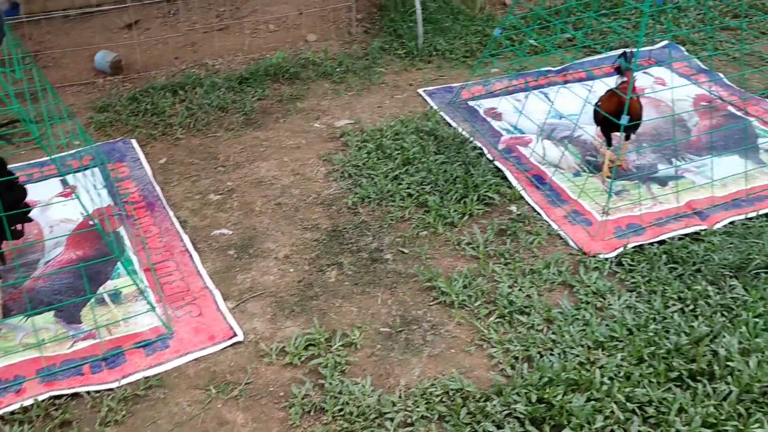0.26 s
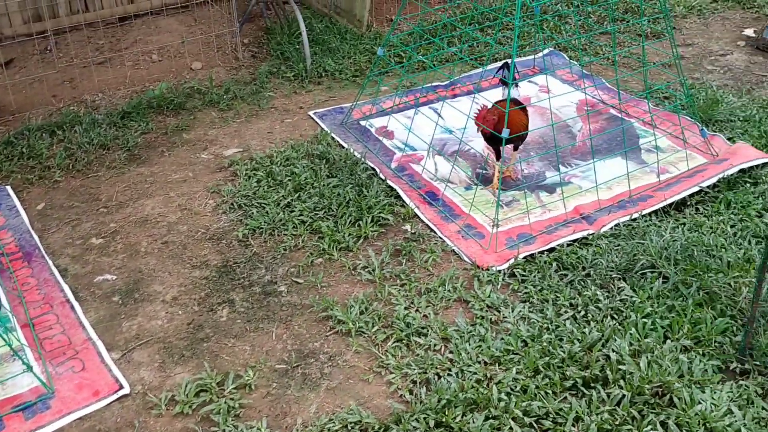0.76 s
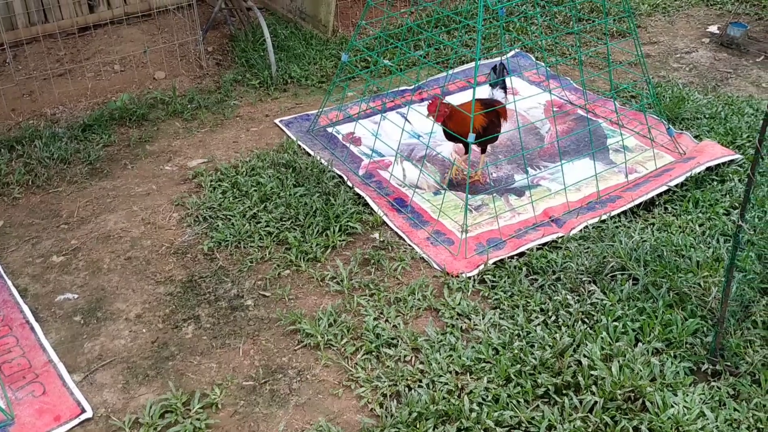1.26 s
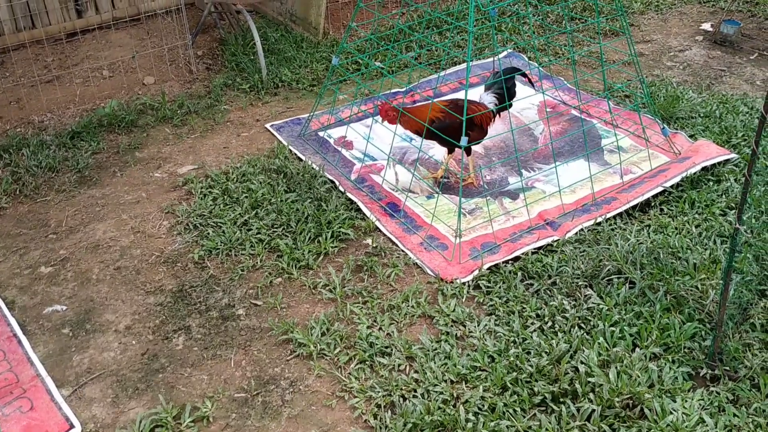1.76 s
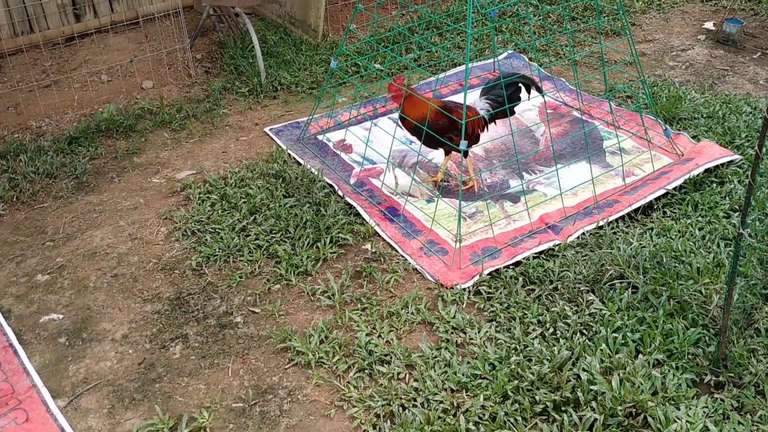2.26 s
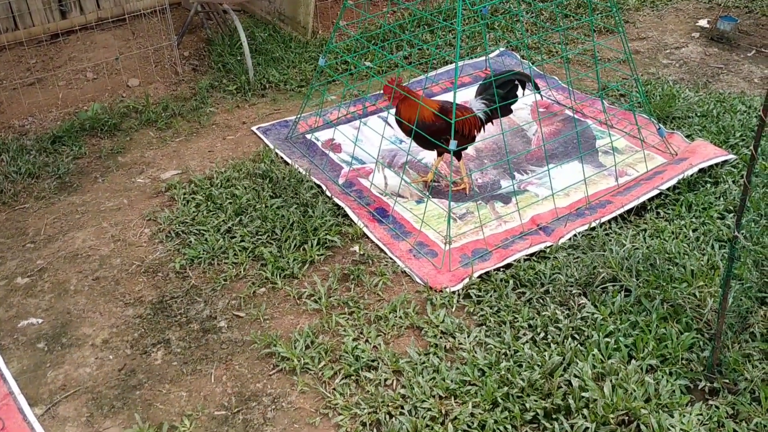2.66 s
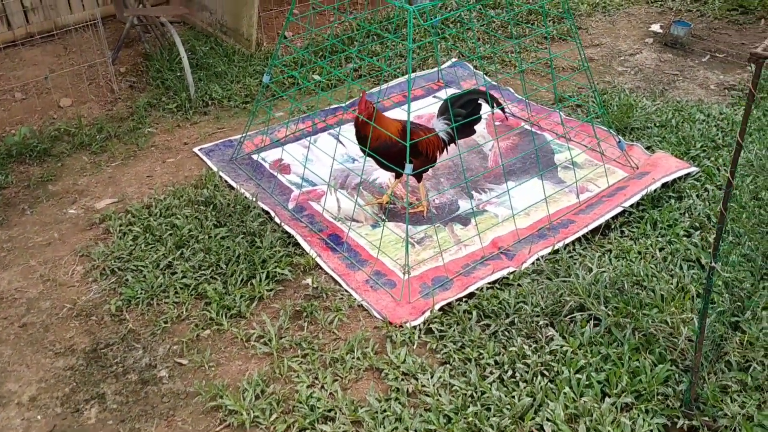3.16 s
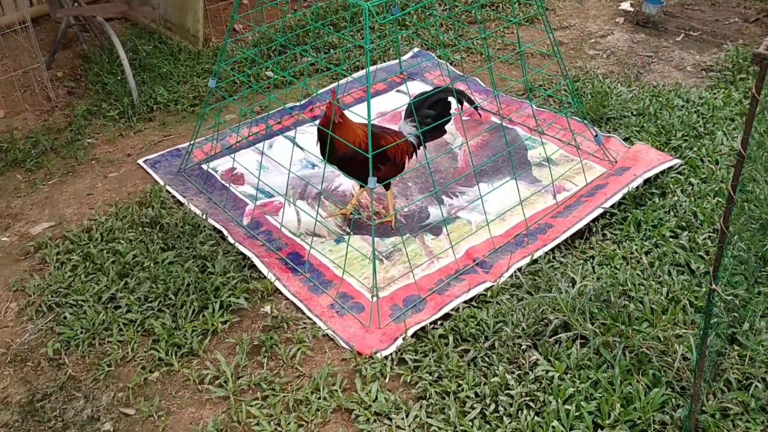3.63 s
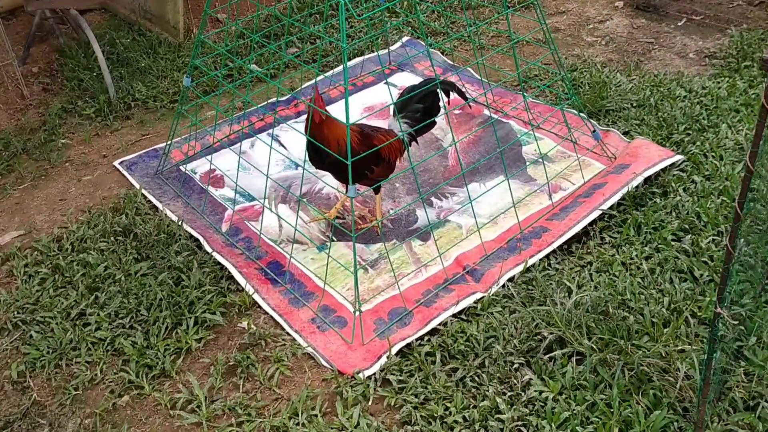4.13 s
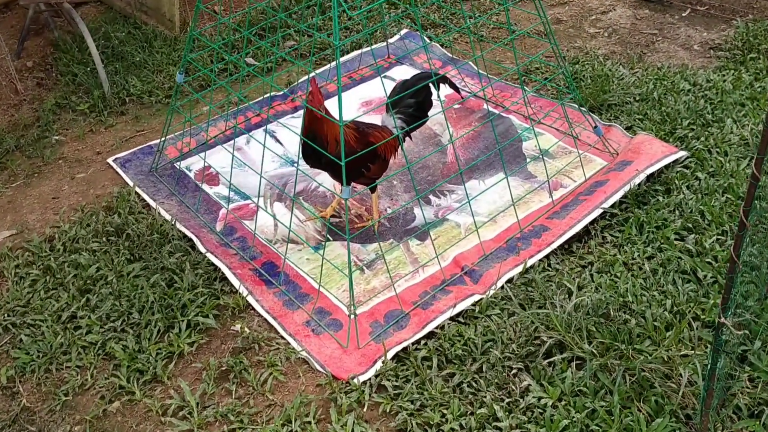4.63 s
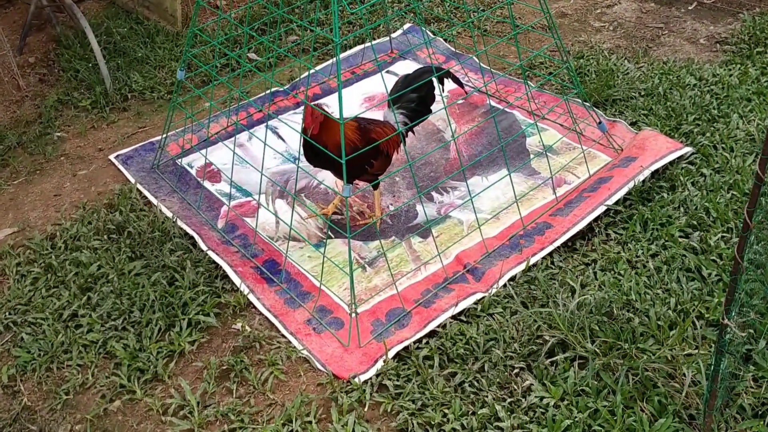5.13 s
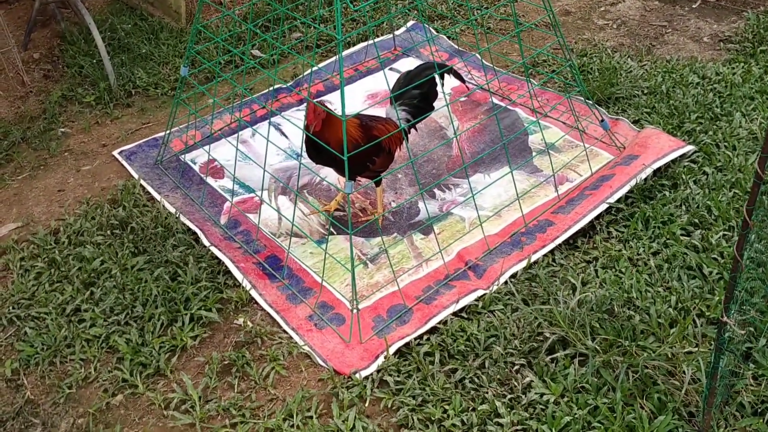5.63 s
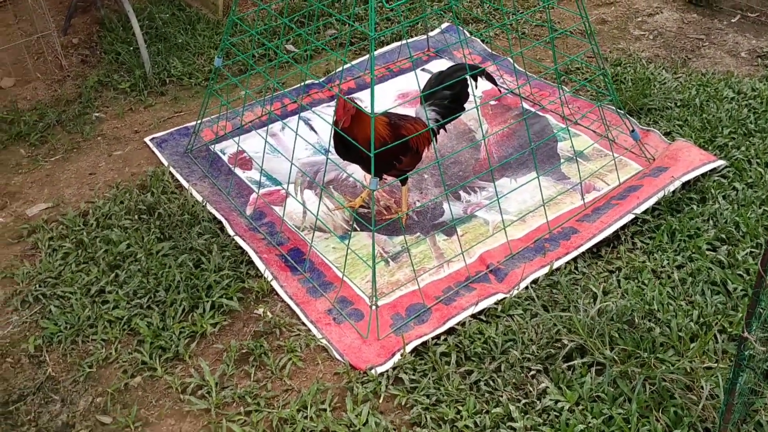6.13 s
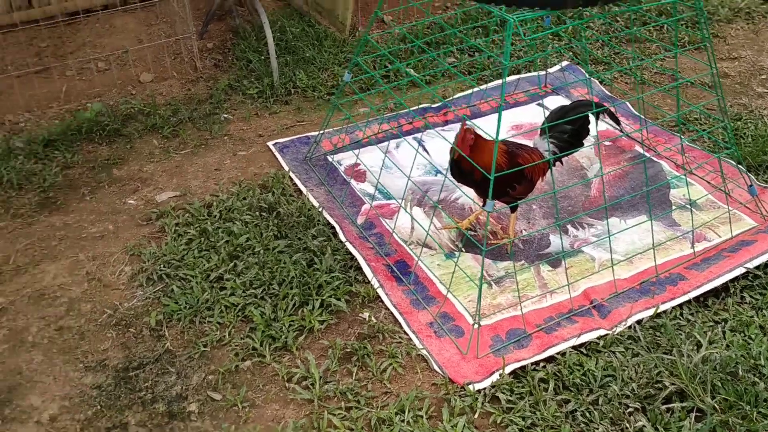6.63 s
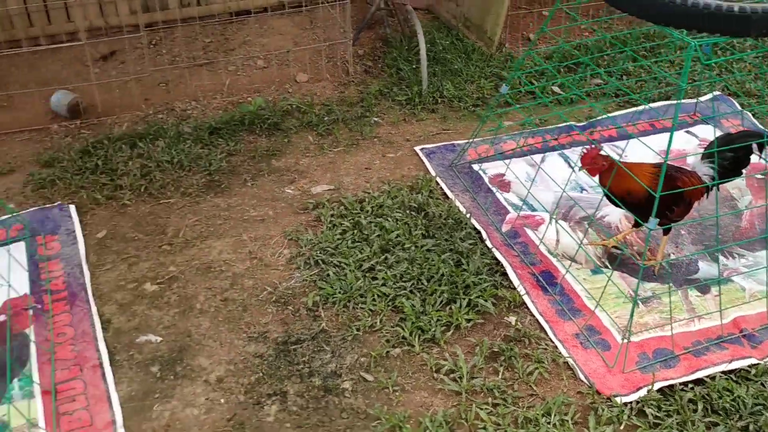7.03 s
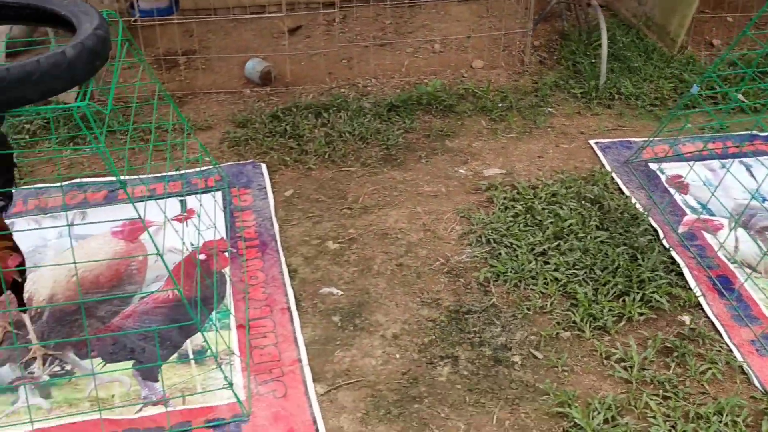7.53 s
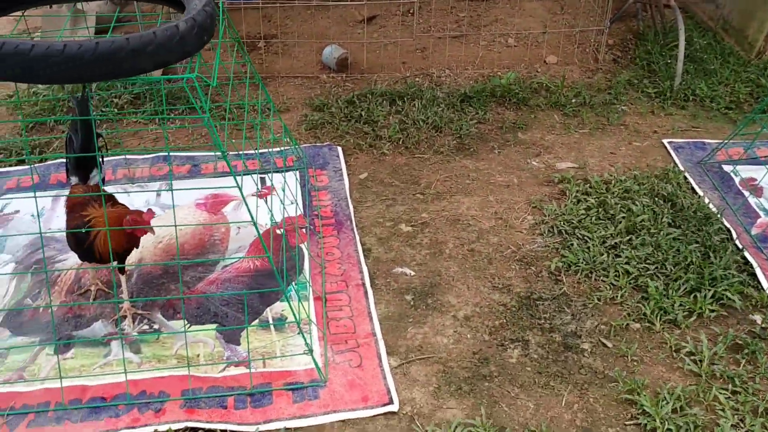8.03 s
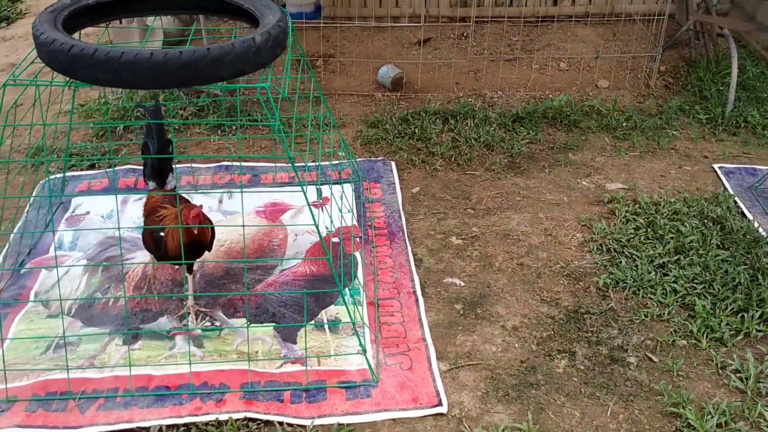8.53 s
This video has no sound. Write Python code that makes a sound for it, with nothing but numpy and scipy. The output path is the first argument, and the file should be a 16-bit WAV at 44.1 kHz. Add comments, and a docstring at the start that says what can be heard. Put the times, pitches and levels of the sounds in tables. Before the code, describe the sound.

A rooster crows loudly once, close by in a yard, while other chickens growl and cluck softly over insect hiss.

```python
"""A rooster crows close by in a grassy yard. The two sides of his syrinx, a pair of self-sustained
oscillators, sing slightly apart and break into a rasp; then the pitch drops. Other fowl growl, whine,
cluck and moan as throat resonances filter their membrane pulses, and a second crow comes from afar.
Feathers and feet rustle, and a small bird whistles upward over a hiss of insects and low background noise.
Low walls give a short echo; the near crow also rings back from far walls and trees."""
import sys
import numpy as np
from scipy import signal
from scipy.fft import rfft, irfft, next_fast_len
from scipy.io import wavfile
from scipy.ndimage import uniform_filter1d, minimum_filter1d, map_coordinates

SR = 44100
rng = np.random.default_rng(int(sys.argv[2]) if len(sys.argv) > 2 else 0)


def waveform_to_disk(signal):
    """Save audio, clipped to [-1, 1], as 16-bit WAV at the path in sys.argv[1]."""
    frames = np.transpose(np.atleast_2d(signal))
    scaled = np.clip(frames, -1, 1) * 32767
    samples = np.round(scaled).astype(np.int16)
    wavfile.write(sys.argv[1], SR, samples)


N = 387198

# Drawn-out calls: (time [s], length [s], first, middle, last pitch [Hz], first, last level [dB],
# roughness [0-1])
GROWLS = [(0, 0.7, 382, 391, 385, -33, -31.5, 0.93), (3.53, 0.32, 337, 287, 318.5, -42, -38.5, 0.32),
          (3.79, .21, 325.5, 370, 342, -39.5, -33, 0.43), (3.98, .52, 360.7, 394, 390, -35.5, -30, 0.715)]
WHINES = [(.46, .36, 1140, 1105, 1154, -26, -28, 0.019), (7.745, 0.14, 1170, 1148, 1103, -19.5, -23, 0.041),
          (8.08, 0.047, 1215, 1157, 1120, -14.5, -24.5, 0.078),
          (8.3, 0.032, 1140, 1080, 1100, -20.5, -22, .06)]
MOANS = [(6.915, 0.067, 347, 330, 295, -51, -44, .1), (7.94, 0.2, 324, 268, 274, -35, -36.5, 0.13),
         (8.19, .62, 364, 382.4, 369, -32.5, -30.5, .2)]
FAR_CROW = [(7.3, 0.13, 860, 886, 950, -47, -40, 0.54), (7.42, 0.11, 980, 1026, 925, -35.5, -43, 0.37),
            (7.52, 0.214, 925, 897, 873, -40, -39.5, 0.26), (7.94, .16, 968, 904, 985, -32.5, -31.5, 0.46)]
# Throat responses for these calls; hens' tuks share HEN_THROAT: (frequency [Hz], gain [dB])
GROWL_THROAT = [(200, -14.5), (380, -7.5), (620, -19), (830, -8), (1120, 3.5), (1450, -4.5), (1900, -21),
                (2500, -24.5), (6000, -59)]
WHINE_THROAT = [(600, -14), (1150, 17), (1700, -37), (2300, -11.5), (3400, -16), (5000, -99)]
HEN_THROAT = [(250, -11.5), (550, -16.5), (720, 6.5), (900, -10), (1150, 6), (1500, -9), (2500, -18.5),
              (5000, -37)]
FAR_THROAT = [(500, -10), (1000, 3), (1400, 7), (1800, 2.5), (2400, -19), (2950, 0), (3600, -37),
              (6000, -55)]

# Levels of the insect hiss and low background noise, ducking under the loud crow and slowly
# coming back: (time [s], level [dB])
DUCKED_HISS_LEVELS = [(0, -36.5), (.8, -36), (.9, -38), (2, -43), (3.2, -41), (5.6, -43.5), (6.4, -41.5),
                      (7.3, -36.5), (8.2, -37.5)]
DUCKED_NOISE_LEVELS = [(0, -41.5), (.8, -47.5), (.95, -55.5), (2.6, -48), (5.5, -49), (8.78, -40.5)]
# Spectra of the noise sources: (frequency [Hz], gain [dB])
INSECT_SPECTRUM = [(3500, -20.5), (5500, -8), (6600, -8.5), (7200, 3.5), (7900, 2.5), (8700, -0.5),
                   (10000, 0.5), (11300, 5.5), (12400, -10.5), (15500, -22)]
LOW_NOISE_SPECTRUM = [(20, 2.5), (130, -3), (250, -9.5), (500, -12), (750, -7), (1700, -3), (2500, -10),
                      (4000, -21), (8000, -38)]
RUSTLE_SPECTRUM = [(200, -41), (600, -9), (2000, 2), (2800, -8), (6000, -21), (12000, -28)]
# Brushes of feathers and feet: (time [s], length [s], level [dB])
RUSTLES = [(0.137, 0.31, -33), (3.23, .05, -44.5), (3.496, 0.12, -30.5), (5.055, 0.011, -33.5),
           (5.551, 0.018, -49), (6.154, 0.16, -39.5)]
# A small bird's slurred whistles: (time [s], length [s], first, last pitch [Hz], level [dB])
WHISTLES = [(.17, 0.12, 4300, 6760, -62), (3.402, 0.013, 3600, 2460, -40), (4.511, .025, 5300, 4600, -46),
            (4.647, 0.1, 4580, 6000, -46), (4.739, .025, 5300, 4600, -43), (5.299, 0.024, 5070, 4600, -49),
            (5.362, .14, 4360, 6250, -42.5), (6.546, .14, 4170, 6900, -45.5),
            (7.543, 0.16, 3990, 7000, -43.5)]

# Notes of each side of the rooster's syrinx: (time [s], length [s], first, middle, last pitch [Hz],
# first, last level [dB], roughness [0-1], opening rasp level [dB], rasp decay time [s])
HIGH_NOTES = [(.801, 0.26, 950, 945, 957, -16, -9.5, 0.66, -8, 0.13),
              (1.03, .14, 912, 1000, 807, -8.5, -11, 0.082, -25, .02),
              (1.18, .51, 953, 960, 943, -10.5, -11.5, 0.52, -13, 0.89),
              (1.675, .365, 913.4, 923.5, 893.5, -13, -6, 0.12, -6.5, 0.12),
              (2.035, 0.21, 868, 858.6, 853, -8.5, -11.5, 0.078, -20, 0.65),
              (2.22, 0.26, 849, 833, 815, -9, -17.5, 0.082, -24, 0.091)]
LOW_NOTES = [(.81, 1.44, 432, 447.6, 424.4, -25, -19.5, 0.0991, -31, 1.5),
             (2.222, .385, 443.5, 442, 425, -11.5, -16.5, 0.082, -38, .3),
             (2.579, 0.22, 367, 357.4, 262, -18.5, -13.5, 0.21, -14.5, .15)]  # hums along at first and sings the ending alone
# His throat and beak for each way of sounding: (frequency [Hz], gain [dB])
HIGH_THROAT = [(500, -32.5), (850, -6.5), (1300, -18), (1700, 4), (2200, 7.5), (2550, -12.5), (3000, -26.5),
               (3400, -61), (3680, -15.5), (3950, -43), (4250, -17.5), (4900, -40.5), (6200, -26),
               (8000, -52), (15000, -38)]
LOW_THROAT = [(330, -54), (480, -41), (620, -6), (730, 11), (880, -5.5), (1080, -17), (1320, -10.5),
              (1760, 2), (2200, -15), (3080, -17.5), (3700, -41.5), (6000, -24), (8000, -57), (15000, -50)]
RASP_THROAT = [(350, -44), (550, -28.5), (730, 0.5), (900, -3.5), (1050, -13.5), (1250, 1), (1550, -5),
               (1830, 4), (2400, -4), (2800, -22), (3400, -8.5), (4100, -74), (5100, -30), (5700, -27),
               (6700, -19), (7700, -59), (15000, -40)]

# Small taps and bumps: (time [s], peak level [dB], centre frequency [Hz], decay time [s])
TAPS = [(3.33, -26, 7140, 0.0033), (6.077, -23.5, 337, 0.0057), (6.861, -28, 500, 0.00077),
        (8.473, -32, 70, .012)]
# Clucks: (time [s], length [s], first, last pitch [Hz], level [dB], roughness [0 = smooth],
# beak opening [0-1])
CLUCKS = [(3.454, 0.044, 352, 330, -37.5, 0.67, 0.06), (4.542, 0.078, 377.6, 343, -29.5, 1, 0.02),
          (4.666, 0.093, 393, 317, -32.5, 0.8, 0), (4.848, 0.056, 392, 339.3, -31, 1.21, 0.17),
          (5.708, 0.03, 299, 320, -35.5, 0.3, 0.71), (6.344, 0.041, 656, 606, -34, 0.03, 0.4),
          (6.896, 0.027, 720, 612, -28, 0, 0.1), (6.97, 0.04, 683, 652, -34.5, 0.14, 0.28),
          (7.02, 0.096, 662, 670, -37, 0, 0.4), (7.138, 0.036, 411, 424, -36, 0.07, 0.15),
          (7.713, 0.041, 669, 694, -23, 0.22, 0.29), (7.987, 0.044, 698, 700, -26, 0.41, 0.37),
          (8.253, 0.046, 479, 476, -23, 0.2, 0.69), (8.359, 0.08, 682, 691.4, -21, 0.17, 0.37),
          (8.415, 0.054, 712, 725, -22, 0.18, 0.39), (8.623, 0.04, 533.5, 465, -20.5, 0.34, 0.5),
          (8.688, 0.051, 518, 451, -25, 0.44, 0.72)]
# Vocal tract responses with the beak shut and open: (frequency [Hz], gain [dB])
BEAK_SHUT = [(200, -2), (400, 1), (520, -2.5), (720, -9.5), (900, -1), (1150, 7.5), (1400, 8),
             (1900, -16.5), (3000, -21.5), (8000, -55)]
BEAK_OPEN = [(200, -26), (720, 4), (1000, -2), (1450, 4), (2000, 1), (2450, -19), (2950, 1.5), (3600, -34),
             (8000, -38)]
# A hen's low, hollow "tuk" calls: (time [s], level [dB])
TUKS = [(5.15, -42.5), (5.377, -40.5), (5.905, -41.5), (6.507, -35), (6.761, -38.5), (7.03, -46),
        (7.328, -38.5), (7.585, -41.5), (7.812, -32.5)]

NOTE_ATTACK_S, NOTE_RELEASE_S = .027, .036  # edges of the near rooster's notes


def undb(db):
    """Amplitude ratio of a level in decibels."""
    return 10 ** (np.asarray(db) / 20)


def unit(x):
    """Normalisation to an rms of 1."""
    return x / np.sqrt(np.mean(x ** 2) + 1e-18)


def envelope(levels):
    """Gain over the whole scene, interpolated in decibels."""
    return undb(np.interp(np.arange(N) / SR, *np.transpose(levels)))


def add(out, start, x):
    """Superposition of x on out from a start time in seconds."""
    i = int(np.clip(start * SR, 0, N))
    out[i:i + len(x)] += x[:N - i]


def wander(n, rate):
    """Smooth, bounded random modulation with spread near 1 and `rate` new values a second."""
    steps = rng.standard_normal(n + 4)[:int(n * rate / SR) + 4]
    return 2 * np.tanh(map_coordinates(steps, [np.arange(n) * rate / SR], order=3) / 2)


def colour(x, response):
    """Minimum-phase filter whose gain follows (frequency [Hz], gain [dB]) points."""
    size = 2 * next_fast_len(len(x) // 2 + 2048)
    hz, db = np.transpose(response)
    bin_hz = np.maximum(np.arange(size // 2 + 1) * SR / size, 1)
    gain = undb(np.interp(np.log(bin_hz), np.log(hz), db))
    cepstrum = irfft(np.log(gain))
    cepstrum[1:size // 2] *= 2  # folding the cepstrum makes the filter causal
    cepstrum[size // 2 + 1:] = 0
    return irfft(rfft(x, size) * np.exp(rfft(cepstrum)))[:len(x)]


def swell(n, edge):
    """Cosine-tapered envelope; `edge` is the share of the length spent on the slopes."""
    return signal.windows.tukey(n, edge)


def gate(t, length, attack_s, release_s):
    """Trapezoidal envelope: attack, hold and release."""
    return np.clip(np.minimum(t / attack_s, (length - t) / release_s), 0, 1)


def phrase(shape, attack_s=NOTE_ATTACK_S, release_s=NOTE_RELEASE_S):
    """Time, pitch and gain of a note: a parabolic glide under a level ramp linear in decibels."""
    length, first_hz, middle_hz, last_hz, first_db, last_db = shape
    t = np.arange(int(length * SR)) / SR
    progress = t / length
    arc = np.polyfit([0, .5, 1], [first_hz, middle_hz, last_hz], 2)
    gain = undb(first_db + (last_db - first_db) * progress) * gate(t, length, attack_s, release_s)
    return t, np.polyval(arc, progress), gain


def syrinx(hz, rough, jitter, shimmer_db, breath, flutter_hz):
    """Membrane oscillation: roughness brings uneven pulses, period doubling and a puff of air a cycle."""
    n = len(hz)
    phase = 2 * np.pi * np.cumsum(hz * (1 + jitter * rough * wander(n, flutter_hz))) / SR
    harmonics = int(.45 * SR / hz.max())
    pulses = unit(sum(np.cos(k * phase) for k in range(1, harmonics + 1)))
    doubling = 1 + .5 * rough * np.cos(phase / 2)
    puffs = breath * rough ** 2 * (1 + np.cos(phase)) * rng.standard_normal(n)
    shimmer = undb(shimmer_db * rough * wander(n, flutter_hz))
    return (pulses * doubling + puffs) * shimmer


def long_calls(calls, throat, waver=.01955):
    """Source and filter: throat resonances shape syrinx pulses, whose pitch wavers with roughness."""
    out = np.zeros(N)
    for start, *shape, rough in calls:
        t, hz, gain = phrase(shape, attack_s=.012, release_s=.022)
        hz = hz * (1 + waver * rough * wander(len(t), 14))
        source = syrinx(hz, rough, jitter=.098, shimmer_db=4, breath=.5, flutter_hz=326.2)
        add(out, start, unit(colour(source, throat)) * gain)
    return out


def insects():
    """Incoherent summation: a chorus of insects merges into high, finely throbbing noise."""
    hiss = unit(colour(rng.standard_normal(N), INSECT_SPECTRUM))
    throb = undb(-.5 + .67 * wander(N, 120))
    return hiss * throb * envelope(DUCKED_HISS_LEVELS)


def low_noise():
    """Ambient noise, strongest in the bass: its level drifts, and ducks under the loud crow."""
    noise = unit(colour(rng.standard_normal(N), LOW_NOISE_SPECTRUM))
    drift = undb(1.7 * wander(N, 5.7))
    return noise * drift * envelope(DUCKED_NOISE_LEVELS)


def rustles():
    """Friction noise: feathers and feet brush in short, grainy bursts."""
    out = np.zeros(N)
    for start, length, db in RUSTLES:
        n = int(length * SR)
        grains = rng.standard_normal(n) * undb(3.7 * wander(n, 498))
        add(out, start, unit(colour(grains, RUSTLE_SPECTRUM)) * swell(n, .4) * undb(db))
    return out


def small_bird():
    """Frequency modulation of a pure tone: each whistle glides faster toward its end."""
    out = np.zeros(N)
    for start, length, first_hz, last_hz, db in WHISTLES:
        n = int(length * SR)
        progress = np.linspace(0, 1, n)
        glide_hz = first_hz + (last_hz - first_hz) * progress ** 1.5
        hz = glide_hz * (1 + .013 * wander(n, 149))
        gain = swell(n, .3) * undb(db + 7.1 * wander(n, 78) - 2.1 * progress)
        add(out, start, np.sin(2 * np.pi * np.cumsum(hz) / SR) * gain)
    return out


def crow(slips_per_s=36, flare_db=1.5):
    """Mode locking: two membranes sing side by side, and the rasp flares whenever their lock slips."""
    slip = wander(N, slips_per_s)
    return high_side(slip) + low_side() + rasp() * undb(flare_db * slip)


def high_side(slip, waver=.0027, throb_hz=112, scoop_s=.035, lock_s=.037):
    """Forced oscillation: the membrane throbs, making sidebands, and sags and weakens as its lock slips."""
    out = np.zeros(N)
    for start, *shape, rough, _, _ in HIGH_NOTES:
        t, hz, gain = phrase(shape)
        scoop = .18 * rough * np.exp(-t / scoop_s)  # rougher notes rise from further below
        rough = np.clip(rough + .38 * np.exp(-t / lock_s), 0, 1)  # a note starts rough, then locks
        slack = rough * slip[int(start * SR):][:len(t)]
        hz = hz * (1 - scoop - .03 * slack + waver * wander(len(t), 40.4))
        throb_rate = throb_hz * (1 + .2 * wander(len(t), 30))
        throb = rough * np.sin(2 * np.pi * np.cumsum(throb_rate) / SR)
        source = syrinx(hz * (1 + .04 * throb), rough, jitter=.04, shimmer_db=4, breath=.08, flutter_hz=90)
        voiced = colour(source * (1 - .7 * throb), HIGH_THROAT)
        add(out, start, unit(voiced * undb(-5 * slack)) * gain)
    return out


def rasp(shrill_db=8, shrill_s=.23):
    """Aperiodic oscillation: a rattle lurches around the low side's pulse rate, shrillest at first."""
    begin, end = HIGH_NOTES[0][0], LOW_NOTES[-1][0] + LOW_NOTES[-1][1]
    t = np.arange(begin, end, 1 / SR)
    pulse_hz = np.full(len(t), float(LOW_NOTES[0][2]))
    for start, *shape, _, _, _ in LOW_NOTES:
        age, hz, _ = phrase(shape)
        pulse_hz = np.where(t < start, pulse_hz, np.interp(t - start, age, hz))
    pulse_hz *= 1 + .055 * wander(len(t), 35)
    rattle = syrinx(pulse_hz, rough=1, jitter=.055, shimmer_db=3.5, breath=.08, flutter_hz=220)
    rattle *= undb(2.2 * wander(len(t), 45))
    voiced = colour(rattle, RASP_THROAT)
    shrill = colour(voiced, [(1900, -15), (2400, 11), (2900, -10.5)])
    shrill *= undb(shrill_db) * np.exp(-(t - begin) / shrill_s)
    out = np.zeros(N)
    add(out, begin, unit(voiced + shrill) * rasp_envelope(t))
    return out


def rasp_envelope(t, crack_db=-4.5, crack_s=.017, lead_s=.02):
    """Addition of powers: rasp opens each note, and the voice cracks just before a high note ends."""
    power = 0
    for k, (start, length, *_, db, decay_s) in enumerate(HIGH_NOTES + LOW_NOTES):
        age = np.maximum(t - start, 0)
        attack_s = .041 if k else .011  # the first blast bursts out; later ones swell
        power += (undb(db) * np.exp(-age / decay_s) * gate(age, length, attack_s, NOTE_RELEASE_S)) ** 2
    for start, length, *_, last_db, _, _, _ in HIGH_NOTES:
        crack_time = start + length - lead_s
        power += undb(last_db + crack_db) ** 2 * np.exp(-((t - crack_time) / crack_s) ** 2)
    return np.sqrt(power)


def low_side(waver=.0027):
    """Biphonation: the second membrane sings about an octave below the first, then falls in pitch."""
    out = np.zeros(N)
    for start, *shape, rough, _, _ in LOW_NOTES:
        t, hz, gain = phrase(shape)
        hz = hz * (1 + waver * wander(len(t), 25))
        source = syrinx(hz, rough, jitter=.035, shimmer_db=5, breath=0, flutter_hz=130)
        add(out, start, unit(colour(source, LOW_THROAT)) * gain)
    return out


def taps():
    """Damped impacts: each is a band of noise that decays exponentially."""
    out = np.zeros(N)
    t = np.arange(SR // 10) / SR
    for start, db, hz, decay_s in TAPS:
        burst = rng.standard_normal(len(t)) * np.exp(-t / decay_s)
        tap = colour(burst, [(hz / 4, -14), (hz, 0), (hz * 4, -18), (hz * 20, -45)])
        add(out, start, tap / np.abs(tap).max() * undb(db))
    return out


def clucks(arch=.063):
    """Vocal tract resonance: short notes arch in pitch, and an open beak lets upper harmonics out."""
    out = np.zeros(N)
    for start, length, first_hz, last_hz, db, rough, opening in CLUCKS:
        n = int(length * SR)
        hz = np.linspace(first_hz, last_hz, n) * (1 + arch * (swell(n, 1) - .5))
        source = syrinx(hz, rough, jitter=.123, shimmer_db=5.5, breath=.5, flutter_hz=342.6)
        voiced = (1 - opening) * colour(source, BEAK_SHUT) + opening * colour(source, BEAK_OPEN)
        add(out, start, unit(voiced) * swell(n, .45) * undb(db))
    return out


def tuks(length_s=.0454, first_hz=215, last_hz=250):
    """Cavity resonance: a few low pulses ring a hen's closed throat and die away."""
    out, n = np.zeros(N), int(length_s * SR)
    hz = np.linspace(first_hz, last_hz, n)
    fade = swell(n, .54) * np.exp(-1.3 * np.linspace(0, 1, n))
    for start, db in TUKS:
        source = syrinx(hz, rough=.81, jitter=.09, shimmer_db=6, breath=.5, flutter_hz=300)
        add(out, start, unit(colour(source, HEN_THROAT) * fade) * undb(db))
    return out


def yard(x, wet_db, t60_s=.31, delay_s=.012):
    """Reverberation: walls and pens scatter the sound, while grass and leaves absorb its treble."""
    t = np.arange(SR) / SR
    tail = rng.standard_normal(len(t)) * undb(-60 * t / t60_s) * (t > delay_s)
    tail = colour(tail, [(2000, 0), (12000, -14)]) / np.sqrt(np.sum(tail ** 2))
    return x + undb(wet_db) * signal.fftconvolve(x, tail)[:N]


def scene():
    """Superposition in one channel: more distant birds have more echo relative to direct sound."""
    rooster = yard(crow(), wet_db=-14, t60_s=.35)
    # only the near crow is loud enough to ring back from far walls and trees
    rooster = yard(rooster, wet_db=-30, t60_s=2)
    flock = long_calls(GROWLS, GROWL_THROAT) + long_calls(MOANS, HEN_THROAT)
    flock += long_calls(WHINES, WHINE_THROAT) + clucks() + tuks() + rustles() + taps()
    distant = long_calls(FAR_CROW, FAR_THROAT) + yard(small_bird(), wet_db=1, t60_s=.5)
    birds = rooster + yard(flock, wet_db=-7.5) + yard(distant, wet_db=-1.5)
    return (birds + insects() + low_noise())[None]


def record(dry, window_s=.003, cutoff_hz=15550):
    """Peak limiting and low-pass filtering: the gain dips at the loudest peaks, and the top is cut."""
    size = int(window_s * SR)
    allowed_gain = 1 / np.maximum(np.abs(dry), 1)
    gain = uniform_filter1d(minimum_filter1d(allowed_gain, size), size)
    lowpass = signal.ellip(10, .1, 80, cutoff_hz, fs=SR, output="sos")
    return signal.sosfilt(lowpass, dry * gain)


dry = scene()
out = record(dry)
waveform_to_disk(out)
```